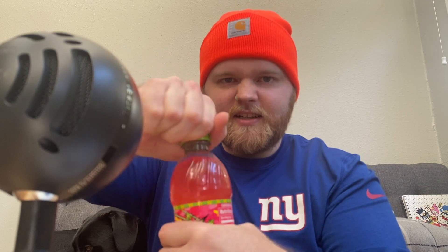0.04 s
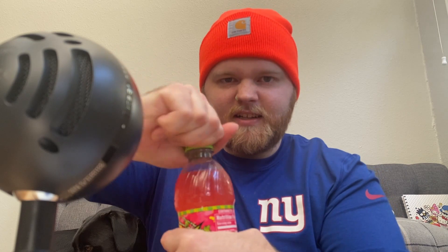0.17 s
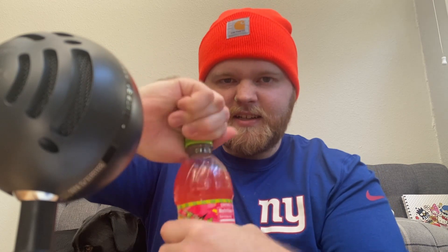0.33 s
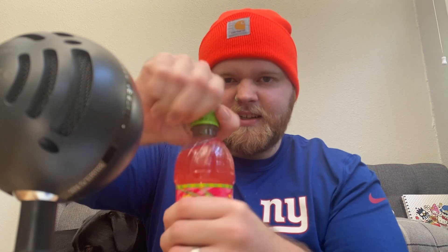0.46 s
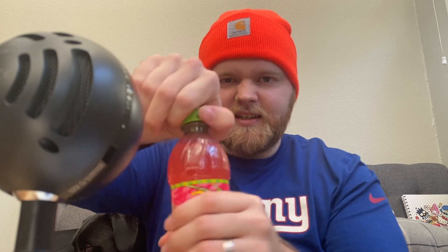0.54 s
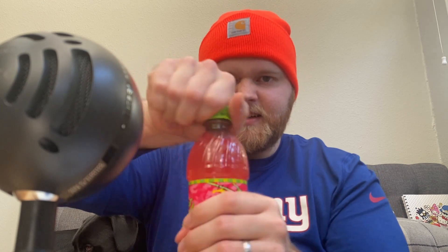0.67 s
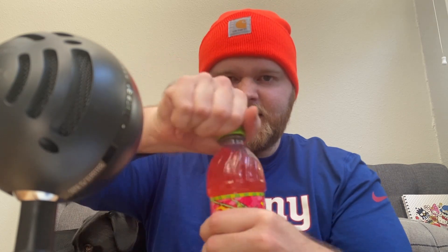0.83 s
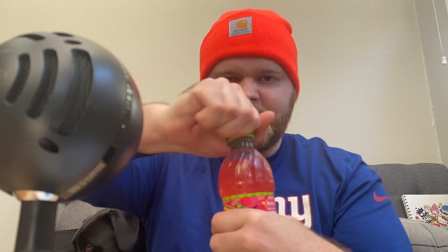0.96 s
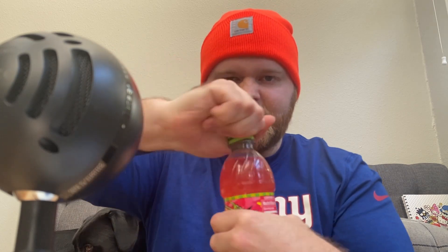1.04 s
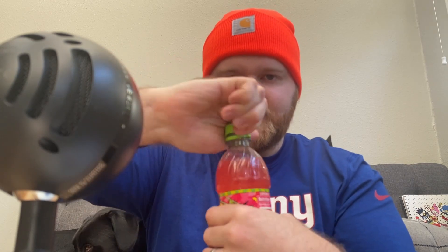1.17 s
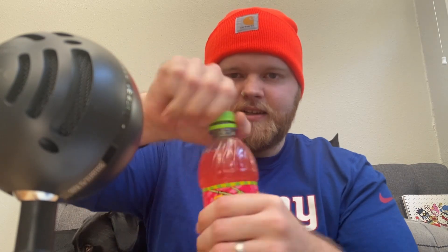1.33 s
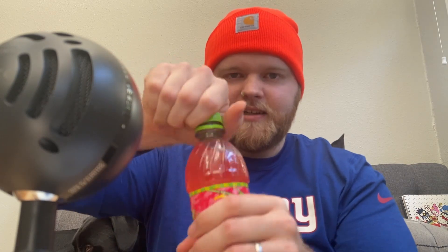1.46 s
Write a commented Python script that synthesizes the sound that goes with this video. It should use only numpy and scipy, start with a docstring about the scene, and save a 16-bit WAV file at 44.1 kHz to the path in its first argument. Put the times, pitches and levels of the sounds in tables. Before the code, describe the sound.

A plastic fizzy drink bottle is opened close to the microphone. A very faint leak comes first, then a strong bright hiss spurts at about 0.25-0.37 seconds, thins to a weak sputtering leak with soft handling thumps, and swells from 0.73. It cuts off in a sharp pop at 0.84. A hard cap click follows at 1.01, then small skids, brief fizz, faint rubs and quiet room noise.

```python
"""Gas hisses out as a hand unscrews the cap of a plastic bottle of fizzy drink, close to a microphone. The hiss
is shaped noise that spurts, thins to a leak, swells and ends as the seal lets go with a pop. The pop and the
clicks of the cap, both while it turns and once it is loose, are decaying tones with a burst of noise; skids,
rubs and a faint, dying fizz are showers of tiny impulses. Soft thumps and the noise of a quiet room lie below."""
import sys
import numpy as np
from scipy import signal
from scipy.fft import rfft, irfft
from scipy.io import wavfile
from scipy.ndimage import uniform_filter1d

SR = 44100
rng = np.random.default_rng(int(sys.argv[2]) if len(sys.argv) > 2 else 0)


def file_out(sig):
    """Save sig as 16-bit WAV at sys.argv[1]."""
    # one column per channel
    cols = np.atleast_2d(sig).T
    # limit, then scale
    lim = np.clip(cols, -1, 1)
    pcm = np.round(lim * 32767).astype(np.int16)
    wavfile.write(sys.argv[1], SR, pcm)


N = 66150  # length in samples: 1.5 seconds
T = np.arange(N) / SR  # time in seconds

# Room noise. Each row: frequency in Hz, relative strength in dB.
ROOM_NOISE = [(20, 7.5), (50, -8), (95, -8), (160, -20), (240, -21), (370, -20.5), (600, -29.5),
              (900, -32.5), (1330, -25.5), (2000, -35), (3160, -35), (4000, -34.5), (5500, -38.5),
              (8000, -30), (10500, -32.5), (13000, -35.5), (16000, -38.5)]
ROOM_NOISE_DB = -57.5
# How long echoes last. Each row: frequency in Hz, time to fall by 60 dB in seconds.
ECHO_TIMES = [(150, 0.14), (1300, 1), (4000, 0.45), (8000, 0.24), (16000, 0.48)]
ECHO_DB = -22.5
# The moving hand bumps bottle and table. Each row: time in seconds, level in dB, frequency in Hz.
BUMPS = [(0.022, -49, 13), (0.38, -54, 81), (0.492, -39.5, 30.6), (.58, -44.5, 8.3), (0.626, -41, 16.5),
         (0.678, -43.5, 29), (1.481, -44, 31)]
# Fizz in the open neck. Each row: frequency in Hz, relative strength in dB per Hz.
FIZZ_COLOUR = [(100, -12.5), (300, 0), (800, -8), (1300, 8.5), (2200, -12), (4000, -7), (8000, -6),
               (11000, -24), (16000, -25.5)]
FIZZ_START_DB, FIZZ_FALL_DB_PER_S, BUBBLES_PER_S = -52, 65, 2000
# Fingers and cap rub on the neck. Each row: middle in seconds, half length in seconds, level in dB.
RUBS = [(0.489, 0.017, -56), (.555, 0.033, -61), (1.086, 0.082, -67), (1.344, 0.014, -60),
        (1.42, 0.023, -62)]
# Tone of the rubs. Each row: frequency in Hz, relative strength in dB.
RUB_COLOUR = [(100, -17), (500, -0.5), (800, 1.5), (1130, 6.5), (1600, -3), (2200, -0.5), (3000, -7),
              (3700, -5), (6000, -13.5), (9000, -3.5), (16000, -30)]
# The loose cap skids along the thread. Each row: middle in seconds, half length in seconds, level in dB.
SKIDS = [(1.063, 0.008, -47), (1.085, 0.0068, -55), (1.113, 0.0066, -59), (1.155, 0.038, -71.5)]
# Tones of the neck in a skid. Each row: frequency in Hz, relative level in dB, 60 dB fall in seconds.
NECK_TONES = [(1740, -1.5, 0.014), (2320, -5, 0.01), (3580, -2, 0.006), (4110, -4, 0.017), (5630, -6, 0.01),
              (7200, -8, .006), (8700, -10, 0.0072)]
# The cap knocks on the threads. Each row: time in seconds, level in dB, brightness in dB per octave.
CLICKS = [(0.1293, -61, 9), (0.196, -58.5, -10.5), (0.222, -42.5, 2.5), (.437, -48, -3),
          (0.487, -49.5, -10.5), (0.723, -44.5, 2.5), (.8775, -51, -9), (0.9061, -38.5, 6.5),
          (0.938, -54, 0), (1.0113, -17, -1), (1.0415, -47, 1.5), (1.0623, -41.5, -5),
          (1.0843, -50.5, -10.5), (1.1115, -44, 0), (1.348, -48.5, -6.5)]
# Tones of the loose cap. Each row: frequency in Hz, relative level in dB, 60 dB fall in seconds.
CAP_TONES = [(461.5, -31, 0.028), (1089, -16.5, 0.024), (1265, -14.5, 0.028), (1800, -11.5, 0.0095),
             (2180, -12, 0.0107), (2460, -20, 0.033), (3570, -1.5, 0.0059), (3960, -3, 0.0096),
             (4540, -8, 0.015), (6750, -4, 0.0067), (8490, -8, 0.0091), (11460, -18.5, 0.0088),
             (12800, -6.5, .006), (13400, -11.5, .006)]
# Cap and neck at the pop. Each row: frequency in Hz, relative level in dB, 60 dB fall in seconds.
POP_TONES = [(650, -22.5, 0.0051), (1072, -2, 0.0087), (1310, -6.5, 0.03), (1640, -16, 0.021),
             (2370, -27, 0.016), (3400, 1.5, 0.0059), (4000, 6, 0.0048), (5620, -0.5, 0.0049),
             (6120, -10, 0.012), (7850, 3.5, 0.0032), (8900, -3.5, .009), (13400, -14.5, .005)]
POP_DB = -17
# Push of air from the neck and the low ring it leaves in the room.
# Each row: frequency in Hz, level in dB, 60 dB fall in seconds.
PUFF_TONES = [(36, -30, 0.094), (125, -18.5, 0.013), (404, -17.5, 0.0024), (101, -64, 7.6)]
# The seal lets go at SEAL_S; the last gas then fades with the time constant VENT_S (both seconds).
SEAL_S, VENT_S = .8365, .0022
# Gas flow through the threads. Each row: time in seconds, level in dB before HISS_DB,
# low band in dB before LOW_DB, top band in dB before TOP_DB.
FLOW = [(0.0, -59.5, -29, -8), (0.046, -53, -9, 1.5), (0.11, -67.5, -7.5, -11), (0.18, -66, -30.5, -7),
        (0.194, -71.5, -4, -12), (0.254, -24.5, -14.5, -14), (0.298, -24, -17, -11.5),
        (0.346, -28.5, -16, -16), (0.392, -52, -8.5, -14.5), (0.406, -43, -13, -6),
        (0.496, -46, -15.5, -14), (0.516, -46.5, -27.5, -1.5), (0.554, -53.5, -32, -12),
        (0.632, -55.5, -37.5, -9), (0.684, -57.5, -34, 0), (0.732, -35.5, -20.5, -11),
        (0.774, -40, -7, -14), (0.812, -27, -15.5, -14.5), (0.831, -28, -8, -15.5)]
HISS_DB, LOW_DB, TOP_DB = 0.27, 15.5, 8
# Basic tone of the hiss. Each row: frequency in Hz, relative strength in dB per Hz.
JET_COLOUR = [(150, -47.5), (300, -37.5), (800, -34.5), (1300, -28.5), (1750, -18), (2050, -21.5),
              (2500, -10), (3100, -15), (4700, -3.5), (6200, -8), (8000, -6), (9700, -4), (11500, -4.5),
              (12800, -4), (15500, -12)]
# Change of tone when the gap is narrow. Each row: frequency in Hz, change in dB.
LEAK_COLOUR = [(3000, -4.5), (4400, -2.5), (5800, -3), (7800, 6), (10500, -3.5), (13000, -7.5), (16000, -1)]
# Resonances of the gap under the cap. Each row: frequency in Hz when spurting, width in Hz,
# boost in dB when spurting, boost in dB when leaking.
GAP_RESONANCES = [(2550, 670, 2.5, 0.5), (4034, 334, 8.5, 11), (7090, 270, 9, 1.5), (8700, 670, 3, -3)]
LEAK_SHIFT = 1.06  # the leaking gap resonates this many times higher
OPEN_DB, SHUT_DB = -30, -60.5  # flow levels at which the gap counts as wide and as narrow
# Passing resonances as the gap and the fingers shift. Each row: middle in seconds,
# half length in seconds, frequency in Hz, half width in Hz, boost in dB.
WHISTLES = [(0.043, .06, 10700, 1000, 11), (0.26, .016, 7050, 350, -0.5), (0.313, .014, 8550, 450, 9),
            (0.325, 0.089, 1350, 590, 8.5), (0.419, 0.023, 4380, 446, 12), (0.545, .025, 12750, 450, 16),
            (0.67, .06, 7700, 700, 6), (0.74, .022, 4100, 350, 7)]
# Treble ripple of the microphone grille. Each row: frequency in Hz, gain in dB.
GRILLE = [(9000, -1), (9900, -1.5), (10450, -6.5), (10900, 0), (11650, 1.5), (12150, -6), (12700, 3),
          (13550, -5), (14000, 3.5), (15300, 2), (15750, -8.5)]
BAND_LIMIT_HZ = 15950


def amp(db):
    """Turns decibels into a gain."""
    return 10 ** (np.asarray(db) / 20)


def unit(x):
    """Scales to an average (rms) strength of 1."""
    return x / np.sqrt(np.mean(x ** 2) + 1e-20)


def read(points, hz):
    """Reads between table rows, with frequency on a log scale."""
    f, value = np.transpose(points)
    return np.interp(np.log(hz + 1), np.log(f + 1), value)


def bell(x, centre, half):
    """A smooth bump of height 1."""
    return np.exp(-((x - centre) / half) ** 2)


def add(mix, start_s, sound):
    """Mixes a sound in from a given time."""
    part = mix[max(round(start_s * SR), 0):][:len(sound)]
    part += sound[:len(part)]


def colour(x, points):
    """Gives a sound the tone of a table, at rms 1."""
    gain = amp(read(points, np.fft.rfftfreq(N, 1 / SR)))
    return unit(irfft(rfft(x) * gain, N))


def ring(tones, tilt_db=0, scatter=0., size=5000):
    """An object struck once rings with several tones, each dying away at its own speed."""
    t = np.arange(size) / SR
    octaves = np.log2(np.array(tones)[:, 0] / 3000)  # the tilt pivots at 3 kHz
    detune = 1 + scatter * rng.standard_normal(len(tones))
    out = np.zeros(size)
    for k, (hz, db, t60) in enumerate(tones):
        strength = (-1) ** k * amp(db + tilt_db * octaves[k])
        decay = np.exp(-np.log(1000) * t / t60)
        out += strength * decay * np.sin(2 * np.pi * hz * detune[k] * t)
    return out


def crack(db, decay_s, size=5000):
    """Plastic crackle: a brief burst of band-limited noise."""
    b, a = signal.butter(1, [1500, 11000], "band", fs=SR)
    noise = signal.lfilter(b, a, rng.standard_normal(size))
    return amp(db) * unit(noise) * np.exp(-np.arange(size) / SR / decay_s)


def grains(per_s, spread_db):
    """Tiny impulses of uneven size at random times."""
    size = amp(spread_db * np.minimum(rng.exponential(1, N), 4))
    sign = rng.choice([-1, 1], N)
    return size * sign * (rng.random(N) < per_s / SR)


def strokes(table):
    """Level over time of a few smooth strokes."""
    return sum(amp(db) * bell(T, middle_s, half_s) for middle_s, half_s, db in table)


def background():
    """Steady noise of the quiet room."""
    return amp(ROOM_NOISE_DB) * colour(rng.standard_normal(N), ROOM_NOISE)


def room(x, first_s=0.0017, echoes_per_s=3000):
    """Sparse reflections of a small furnished room, each band dying at its own speed."""
    echoes = rng.standard_normal(N) * (rng.random(N) < echoes_per_s / SR) * (T > first_s)
    hz, t, bands = signal.stft(echoes, SR, nperseg=256)
    decay = np.exp(-np.log(1000) * t / read(ECHO_TIMES, hz)[:, None])
    tail = signal.istft(bands * decay, SR, nperseg=256)[1]
    return signal.fftconvolve(x, tail / np.linalg.norm(tail))[:N]


def bumps():
    """Soft low thumps of handling, about one cycle each."""
    out = np.zeros(N)
    for s, db, hz in BUMPS:
        out += amp(db) * bell(T, s, .5 / hz) * np.cos(2 * np.pi * hz * (T - s))
    return out


def fizz(bubble_spread_db=4.0):
    """Small bubbles burst in the opened neck and die down."""
    age = T - SEAL_S
    level = amp(FIZZ_START_DB - FIZZ_FALL_DB_PER_S * np.maximum(age, 0))
    return colour(grains(BUBBLES_PER_S, bubble_spread_db), FIZZ_COLOUR) * (age > 0) * level


def rubs():
    """Fine slips of skin and plastic under each stroke."""
    return colour(grains(per_s=11000, spread_db=3.0), RUB_COLOUR) * strokes(RUBS)


def skids():
    """Quick runs of tiny slips ring the threaded neck."""
    slips = grains(per_s=3000, spread_db=3)
    chatter = signal.fftconvolve(slips, ring(NECK_TONES))[:N]
    return unit(chatter) * strokes(SKIDS)


def clicks():
    """The cap catches on the threads and rings briefly."""
    out = np.zeros(N)
    for s, db, tilt_db in CLICKS:
        knock = ring(CAP_TONES, tilt_db, scatter=.012)
        crackle = crack(db=-10 + tilt_db, decay_s=0.0023)
        add(out, s, amp(db) * (knock + crackle))
    return out


def pop():
    """The seal lets go: a push of air, then at once a snap of the cap."""
    out = np.zeros(N)
    snap = ring(POP_TONES) + crack(db=-4, decay_s=.0007)
    add(out, SEAL_S, -ring(PUFF_TONES, size=N))
    add(out, SEAL_S + 0.00022, amp(POP_DB) * snap)
    return out


def hiss(patchy_db=1.9, flutter_db=0.56, low_hz=3200, top_hz=10000):
    """Turbulent gas rings the gap under the cap, which widens with the flow."""
    hz, t, noise = signal.stft(rng.standard_normal(N), SR, nperseg=256, noverlap=192)
    f = hz[:, None]
    s, *columns = np.transpose(FLOW)
    level, low, top = (np.interp(t, s, column) for column in columns)
    # 0 when the gap is wide, 1 when it is narrow
    narrow = np.clip((OPEN_DB - level) / (OPEN_DB - SHUT_DB), 0, 1)

    # tone in dB for every frequency and moment
    tone = read(JET_COLOUR, f) + narrow * read(LEAK_COLOUR, f)
    tone = tone + (low + LOW_DB) / (1 + (f / low_hz) ** 10)
    tone = tone + (top + TOP_DB) / (1 + (top_hz / (f + 1)) ** 20)
    for centre, width, open_db, leak_db in GAP_RESONANCES:
        offset = f - centre * (1 + (LEAK_SHIFT - 1) * narrow)
        boost = open_db + (leak_db - open_db) * narrow
        tone = tone + boost / (1 + (2 * offset / width) ** 2)
    for middle_s, half_s, centre, half_hz, db in WHISTLES:
        tone = tone + db * bell(t, middle_s, half_s) * bell(f, centre, half_hz)
    # random patches, smoothed over frequency and then over time
    patches = uniform_filter1d(rng.standard_normal(noise.shape), size=3, axis=0)
    tone = tone + patchy_db * unit(uniform_filter1d(patches, size=22, axis=1))

    # even out each moment, so that the flow alone sets the level
    gain = amp(tone) / np.sqrt(np.mean(amp(tone) ** 2, axis=0))
    flutter = flutter_db * unit(uniform_filter1d(rng.standard_normal(len(t)), size=4))
    shaped = noise * gain * amp(level + flutter + HISS_DB)
    jet = signal.istft(shaped, SR, nperseg=256, noverlap=192)[1][:N]
    return jet * np.exp(-np.maximum(T - SEAL_S, 0) / VENT_S)


def scene():
    """The bottle and its echoes, with handling thumps and room noise."""
    bottle = hiss() + pop() + clicks() + skids() + rubs() + fizz()
    echoes = amp(ECHO_DB) * room(bottle)
    return (bottle + echoes + bumps() + background())[None]


def record(dry):
    """The microphone grille colours the treble, then the recorder cuts the highest frequencies."""
    log_gain = np.log(amp(read(GRILLE, abs(np.fft.fftfreq(512, 1 / SR)))))
    # minimum phase: the filter responds as early as it can
    grille = np.fft.ifft(np.exp(np.conj(signal.hilbert(log_gain)))).real
    heard = signal.oaconvolve(dry, grille[None])[:, :N]
    low_pass = signal.firwin(255, BAND_LIMIT_HZ, window=("kaiser", 9), fs=SR)
    return signal.oaconvolve(heard, low_pass[None], "same")


dry = scene()
out = record(dry)
file_out(out)
```